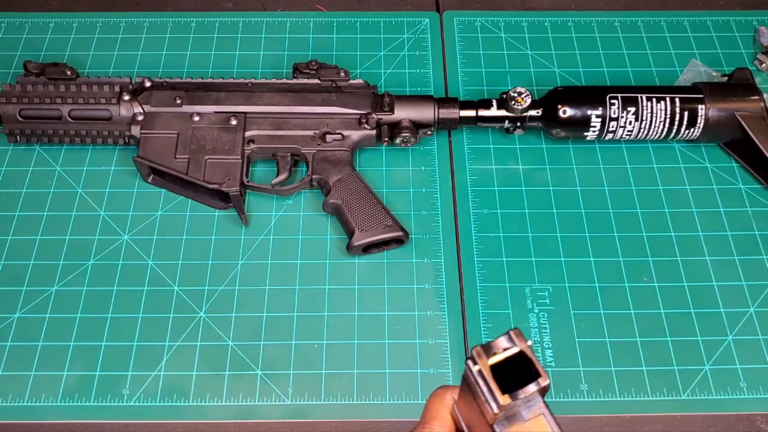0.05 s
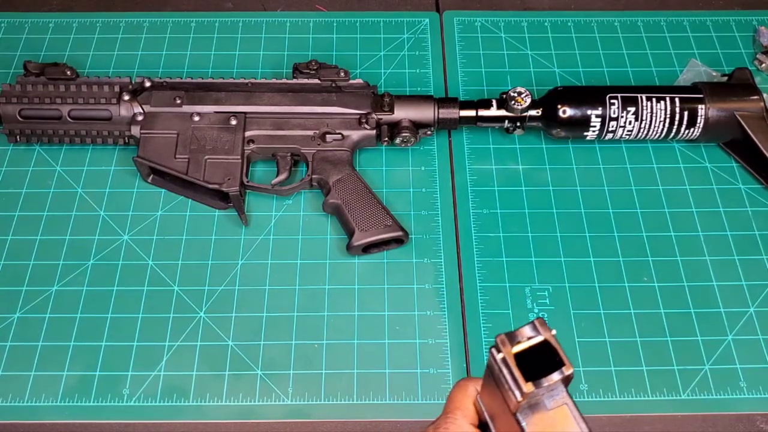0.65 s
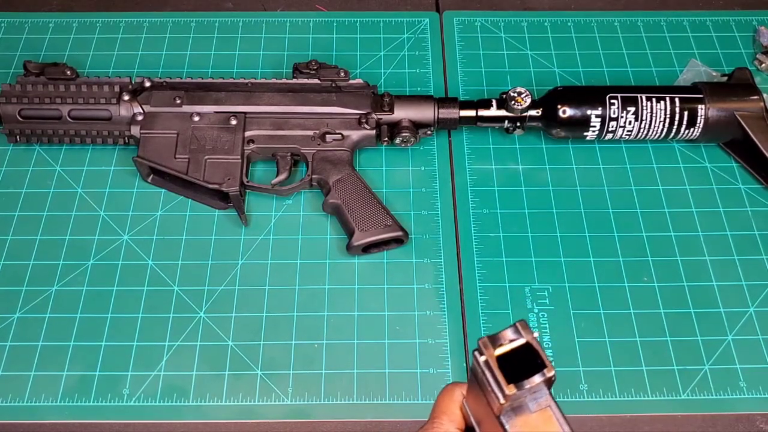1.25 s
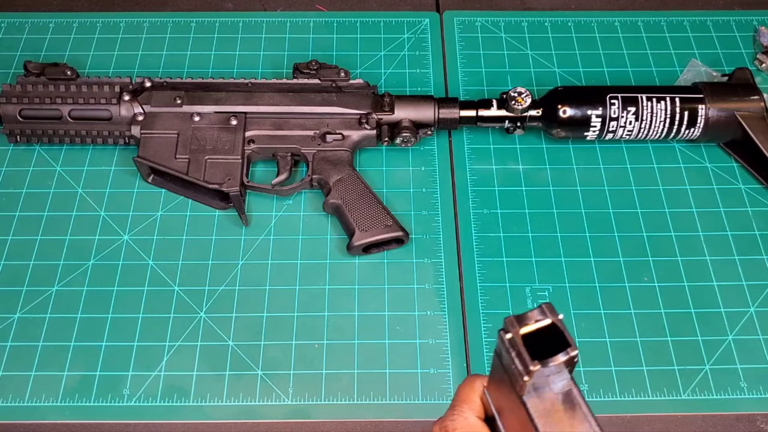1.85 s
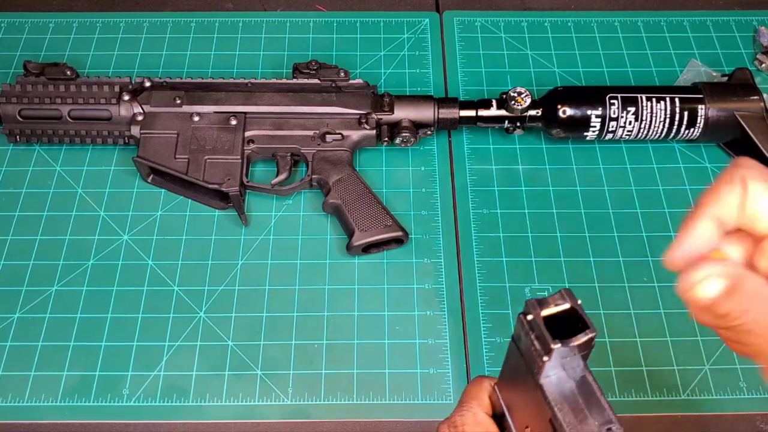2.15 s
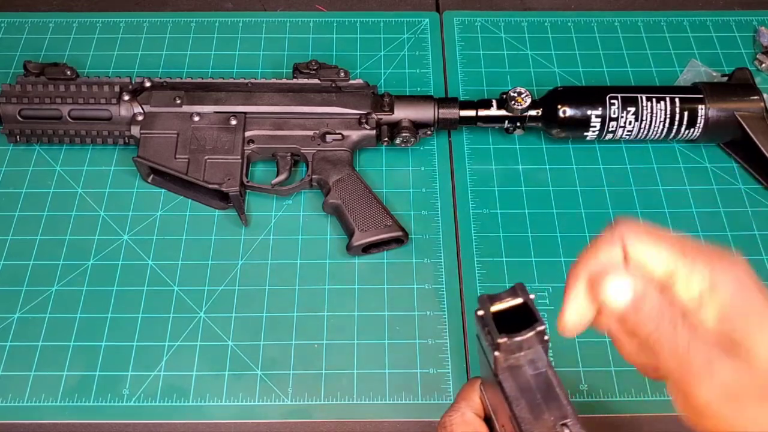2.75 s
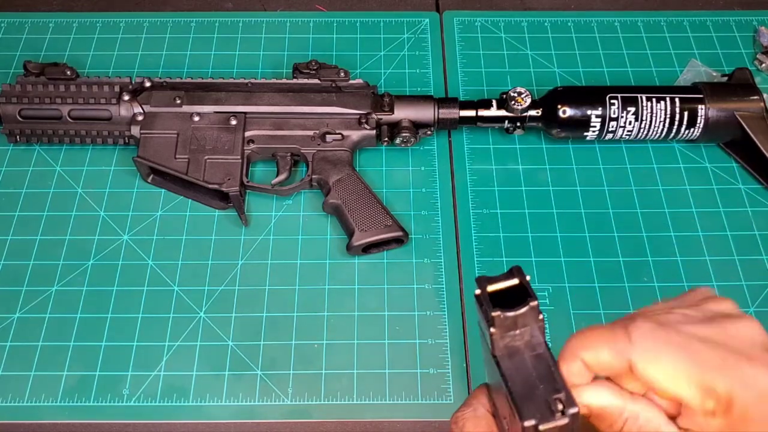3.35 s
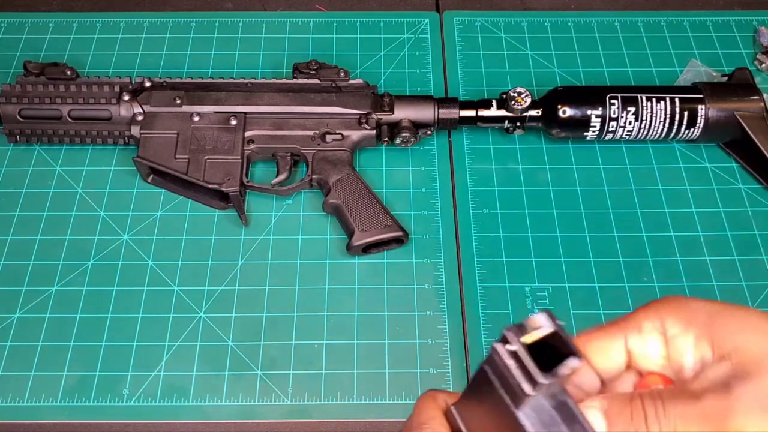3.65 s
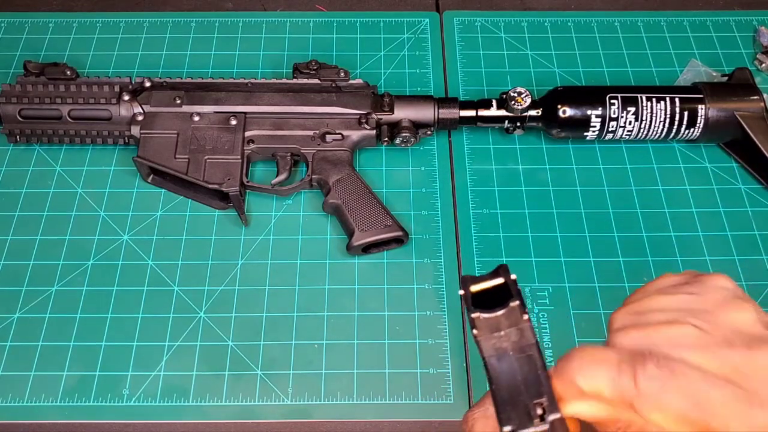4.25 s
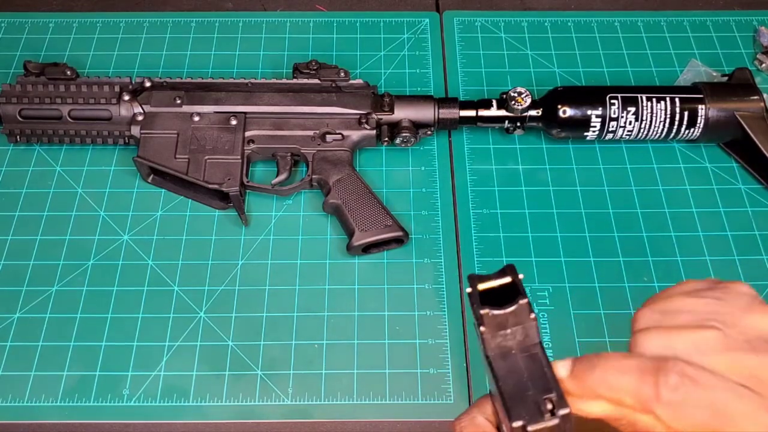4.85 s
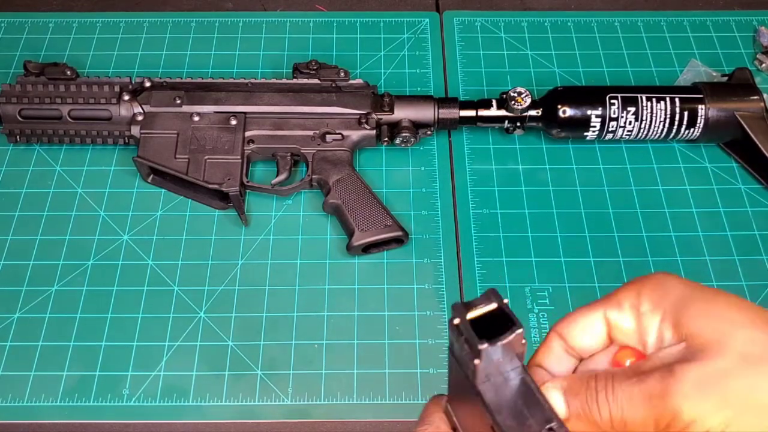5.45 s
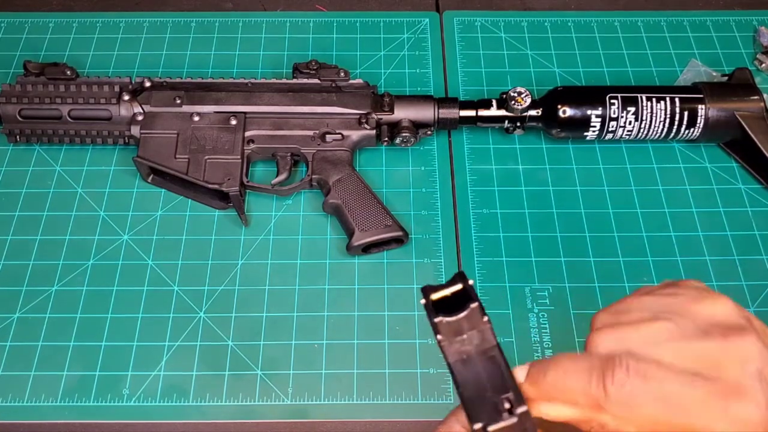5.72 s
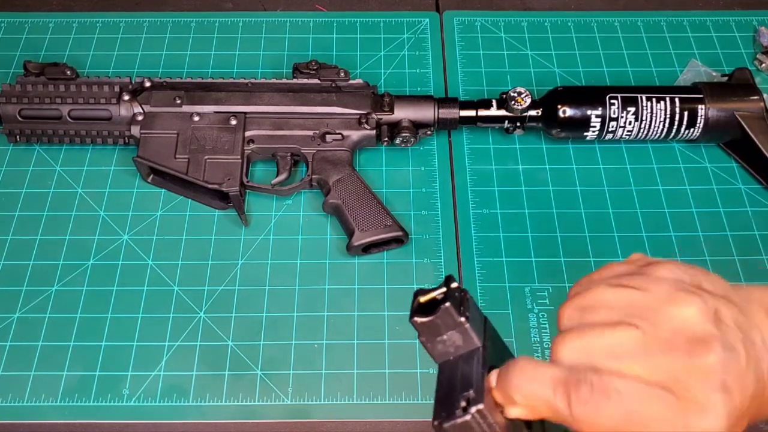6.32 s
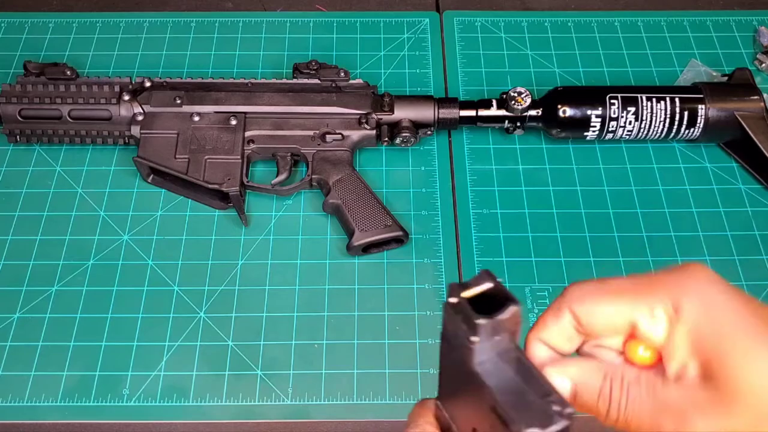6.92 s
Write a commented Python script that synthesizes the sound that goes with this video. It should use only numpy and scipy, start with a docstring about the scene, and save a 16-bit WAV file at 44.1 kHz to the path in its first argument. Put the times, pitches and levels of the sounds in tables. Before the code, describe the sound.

Faint handling ticks on plastic, then four close twists of a spring-loaded magazine winder, each a quick run of hollow ratchet snaps.

```python
"""A workbench in a small quiet room, with a stereo pair of microphones close to the hands.
A plastic paintball magazine is wound in four twists: a pawl snaps over the ratchet teeth and rings
the hollow shell, and after each twist the released winder knocks as it settles. Two snaps carry a low pop.
Fingers tick and rub on the plastic before and between the twists; behind them the room hums faintly."""
import sys
import numpy as np
from scipy import signal
from scipy.fft import rfft, irfft
from scipy.io import wavfile

SR = 44100
rng = np.random.default_rng(int(sys.argv[2]) if len(sys.argv) > 2 else 0)


def materialize(psi):
    """Save the field psi as 16-bit PCM at rate SR to the path in sys.argv[1].

    A 1-D psi becomes a single channel; in a 2-D psi each row is a channel.
    """
    bounded = np.clip(np.atleast_2d(psi).T, -1, 1)
    quanta = np.round(bounded * 32767).astype(np.int16)
    wavfile.write(sys.argv[1], SR, quanta)


N = 307818

# spectrum of the steady background hiss, much fainter above 8 kHz: frequency_hz, relative_db
HISS_SPECTRUM = [(20, -21.5), (62, -2), (100, -11), (200, -16.5), (300, -14.5), (500, -22.5), (1050, -25.5),
                 (1600, -27.5), (3000, -28.5), (5500, -35), (7200, -38), (8500, -55), (11000, -46),
                 (15500, -43)]
# its lean across the microphones: frequency_hz, left_minus_right_db
HISS_PAN = [(60, 4), (150, -3), (380, 1), (950, -1), (2380, -2.0), (5980, -4.5), (15000, 5)]
# its stereo width: frequency_hz, side_minus_mid_db
HISS_WIDTH = [(60, -7), (150, -9), (380, -1), (950, 7.5), (2380, 0.5), (5980, 0), (15000, -1.5)]
# steady tones in the room: pitch_hz, width_hz, level_db, left_minus_right_db
HUM_TONES = [(60.5, 10, -70, 2.5), (1570, 160, -79.5, 5)]
# time for the room to die away: frequency_hz, t60_s
ROOM_DECAY = [(200, 0.64), (1000, 0.28), (2000, 0.37), (4000, 0.34), (7500, .4), (11000, .3), (16000, 0.26)]
# colour of the reflections: frequency_hz, relative_db
REFLECTION_COLOUR = [(200, 9), (1000, -1.5), (1800, 0.5), (3500, -2.5), (6000, -3), (8500, -6.5),
                     (12000, 0), (15500, 1)]
# fingers sliding on the plastic: middle_s, half_length_s, level_db, low_hz, high_hz
FINGER_RUBS = [(0.158, 0.03, -43, 620, 3540), (1.55, 0.025, -76, 8800, 15600),
               (1.709, 0.033, -58.5, 2300, 6800), (2.2, 0.15, -76, 1500, 6400),
               (2.83, 0.065, -74, 9900, 15600), (4.06, 0.017, -68, 1070, 3440),
               (4.84, 0.028, -66.5, 1490, 6850)]
# light finger contacts: start_s, level_db, low_hz, high_hz, decay_ms, left_minus_right_db
FINGER_TICKS = [(0.121, -47.5, 886, 4400, 1.2, -6), (0.1524, -34, 560, 2400, 1.1, -5),
                (0.4586, -35.5, 4200, 6970, 0.49, -4.5), (0.477, -52, 3000, 7000, .8, 10),
                (0.876, -53.5, 244, 1230, 14.6, -3), (1.055, -43.5, 2500, 3900, 5, -1),
                (1.0605, -55.5, 397, 2000, 31, -3), (1.673, -43, 3000, 7300, 1.4, 0),
                (1.712, -49.5, 2900, 7000, .8, 2), (2.216, -62.5, 3000, 7000, 1, -4),
                (2.400, -35, 940, 4240, 2.9, 2.5), (2.74, -56, 2200, 5630, 5.4, 0),
                (3.239, -56.5, 1126, 6400, 2.9, -7), (4.239, -51.5, 890, 3860, 2.6, -8),
                (4.299, -44, 2590, 8870, 1.8, -2), (5.177, -58, 3236, 5880, 3.45, -9)]
# first knock of the released winder after each twist: start_s, level_db
WINDER_RELEASES = [(3.747, -42), (4.637, -45.5), (5.597, -43.5), (6.909, -47.5)]
# low pops that come with two of the snaps: start_s, peak_db
LOW_POPS = [(3.5192, -21.5), (4.375, -31)]
# twists; the spring makes all cracks of one twist equally hard: start_s, crack_db, left_minus_right_db
WINDER_TWISTS = [(3.4, -17, -0.8), (4.3, -18, 0.4), (5.2, -17.5, 0.6), (6.3, -18.5, 2)]
# the pawl's snaps, whose hollow ring varies from tooth to tooth: start_s, ring_db
PAWL_SNAPS = [(3.4359, -16.5), (3.468, -16), (3.4965, -17), (3.5201, -16), (3.5409, -16), (3.5614, -15.5),
              (3.5827, -18.5), (3.6099, -17), (4.3219, -16), (4.3755, -15.5), (4.4107, -18.5),
              (4.4368, -19.5), (4.4594, -18), (4.4809, -18.5), (4.502, -20), (4.5257, -18), (5.2734, -19),
              (5.3212, -15), (5.3508, -17), (5.3748, -16), (5.3964, -19), (5.4195, -17), (5.4469, -16.5),
              (5.48, -18.5), (6.3878, -16), (6.4357, -14.5), (6.4867, -16.5), (6.5267, -19), (6.576, -18),
              (6.631, -18.5), (6.6788, -19.5), (6.7189, -18), (6.7515, -17), (6.7861, -19)]
# modes of the shell and pawl: pitch_hz, width_hz, relative_db, left_minus_right_db
SHELL_MODES = [(1767, 60, -14.5, -9.5), (1809, 57, -6.5, -6.5), (1899, 200, -2.5, -2),
               (2251, 490, -11.5, -4), (2483, 190, -10.5, 0), (3020, 55, -21, -3), (3527, 160, -3.5, -1.5),
               (3854, 450, -10, -3.5), (4630, 1100, -11, -5), (5740, 480, -7, -1.5), (6150, 520, -7, 4),
               (6850, 230, -14, -5.5), (7116, 1100, -8, 2), (8880, 700, -17.5, 6), (10900, 1100, -15, -3.5),
               (12160, 930, -16, 0.5), (13000, 1200, -18.5, -7), (14800, 890, -15, 3.5)]

RING_HZ, CLACK_HZ, CRACK_HZ = 1890, 3300, 6200  # the three registers of a snap


def from_db(db):
    """Decibels to gain."""
    return 10 ** (np.asarray(db) / 20)


def rms_one(x):
    """Scale to unit rms."""
    return x / np.sqrt(np.mean(x ** 2) + 1e-20)


def at_hz(points, hz):
    """Read a table on a log-frequency axis."""
    f, value = np.transpose(points)
    return np.interp(np.log(np.maximum(hz, 1)), np.log(f), value)


def panned(db):
    """Left and right microphone gains as a column."""
    return from_db(np.array([[db], [-db]]) / 2)


def add(out, s, sound):
    """Mix a short sound in at time s."""
    i = int(round(s * SR))
    out[:, i:i + sound.shape[-1]] += sound[..., :N - i]


def band(x, low_hz, high_hz, order=3):
    """Causal band-pass."""
    return signal.sosfilt(signal.butter(order, [low_hz, high_hz], "band", fs=SR, output="sos"), x)


def stereo_noise(size, alike):
    """White noise partly shared by the two microphones."""
    mid, side = rng.standard_normal((2, size))
    return np.sqrt((1 + alike) / 2) * mid + np.sqrt((1 - alike) / 2) * np.array([side, -side])


def hiss_and_hum(hiss_db=-61.5):
    """Soft steady background hiss, with narrow bands of noise for the room's wavering hum."""
    hz = np.fft.rfftfreq(N, 1 / SR)
    mid, side = rfft(rng.standard_normal((2, N))) * from_db(at_hz(HISS_SPECTRUM, hz))
    hiss = mid + from_db(at_hz(HISS_WIDTH, hz)) * np.array([side, -side])
    balance = from_db(np.outer([1, -1], at_hz(HISS_PAN, hz)) / 2)
    out = from_db(hiss_db) * rms_one(irfft(hiss * balance, N))
    for pitch_hz, width_hz, level_db, pan_db in HUM_TONES:
        hum = rfft(rng.standard_normal(N)) / (1 + (2 * (hz - pitch_hz) / width_hz) ** 2)
        out += from_db(level_db) * panned(pan_db) * rms_one(irfft(hum, N))
    return out


def reflections(x, gain_db=-35, early_db=-3, early_s=0.013, first_s=0.0016, move_s=.09, patterns=6):
    """Close reflections merge into a tail, longest in the bass; their pattern shifts as the hands move."""
    t = np.arange(SR * 3 // 5) / SR
    hz, centres_hz = np.fft.rfftfreq(len(t), 1 / SR), np.geomspace(200, 16000, 12)
    bands = np.array([np.interp(hz, centres_hz, row) for row in np.eye(len(centres_hz))])[:, None]
    colour_db = at_hz(REFLECTION_COLOUR, centres_hz)[:, None, None]
    t60_s = at_hz(ROOM_DECAY, centres_hz)[:, None, None]
    decays = from_db(colour_db - 60 * t / t60_s)
    onset = (t > first_s) * (1 + from_db(early_db) * np.exp(-t / early_s))
    place, out = np.arange(N) / SR / move_s, np.zeros((2, N))
    for k in range(patterns):
        noise_bands = irfft(bands * rfft(stereo_noise(len(t), alike=0.091)), len(t))
        tail = onset * (noise_bands * decays).sum(0)
        crossfade = np.clip(1 - np.abs((place - k) % patterns - patterns / 2), 0, 1)
        out += signal.oaconvolve(x * np.sqrt(crossfade), tail, axes=1)[:, :N]
    return from_db(gain_db) * out


def finger_rubs(grain_spread_db=4):
    """Skin slides on plastic: dense uneven grains that swell and fade."""
    out = np.zeros((2, N))
    for middle_s, half_s, level_db, low_hz, high_hz in FINGER_RUBS:
        stroke = np.arange(-2, 2, 1 / (half_s * SR))  # time from the middle, in half lengths
        grains = stereo_noise(len(stroke), alike=0.15)
        grains *= from_db(grain_spread_db * rng.standard_normal(len(stroke)))
        rub = rms_one(band(grains, low_hz, high_hz)) * np.exp(-stroke ** 2)
        add(out, middle_s - 2 * half_s, from_db(level_db) * rub)
    return out


def winder_knocks(count=3, gap_s=0.024, loss_db=3.5, low_hz=1214, high_hz=1900, decay_ms=1.9):
    """The released winder knocks a few times, each time more softly; rows as in FINGER_TICKS."""
    return [(start_s + k * gap_s, level_db - k * loss_db, low_hz, high_hz, decay_ms, 0)
            for start_s, level_db in WINDER_RELEASES for k in range(count)]


def small_contacts(grit_db=-13, spill_db=-16):
    """Ticks and knocks: a sharp touch and dying grit, strongest in the range of the part touched."""
    out, t = np.zeros((2, N)), np.arange(SR // 20) / SR
    for start_s, level_db, low_hz, high_hz, decay_ms, pan_db in FINGER_TICKS + winder_knocks():
        touch = from_db(grit_db) * stereo_noise(len(t), alike=0.22) * np.exp(-t * 1000 / decay_ms)
        touch[:, 0] += 1
        spill = from_db(spill_db) * band(touch, low_hz=600, high_hz=6000, order=6)
        tick = band(touch, low_hz, high_hz) + spill
        tick /= np.sqrt(np.mean(tick[:, :SR // 300] ** 2))  # unit rms over the first 3.3 ms
        add(out, start_s, from_db(level_db) * panned(pan_db) * tick)
    return out


def low_pops(start_hz=950, fall_s=0.0027, swell_s=0.0016, right_gain=-0.36):
    """Short low pops, mostly in the left microphone, whose pitch drops away within a few cycles."""
    out, t = np.zeros((2, N)), np.arange(SR // 50) / SR
    cycles = start_hz * fall_s * (1 - np.exp(-t / fall_s))
    pop = np.sin(2 * np.pi * cycles) * t / swell_s * np.exp(1 - t / swell_s)
    for start_s, peak_db in LOW_POPS:
        add(out, start_s, from_db(peak_db) * np.array([pop, right_gain * pop]))
    return out


def pawl_snaps(clack_offset_db=-0.16, clack_fade_db=5, pan_per_db=-0.14):
    """Each snap's time, register levels and pan: the clack fades over a twist, a full ring leans right."""
    snaps = np.array(PAWL_SNAPS)
    twist_of_snap = np.searchsorted([row[0] for row in WINDER_TWISTS], snaps[:, 0]) - 1
    for k, (_, crack_db, pan_db) in enumerate(WINDER_TWISTS):
        teeth = snaps[twist_of_snap == k]
        for (start_s, ring_db), turned in zip(teeth, np.linspace(-.5, .5, len(teeth))):
            clack_db = crack_db + clack_offset_db - clack_fade_db * turned
            yield start_s, (ring_db, clack_db, crack_db), pan_db + pan_per_db * (ring_db - crack_db)


def pawl_contact(t, chatter_db=-23, chatter_s=0.0029):
    """The pawl strikes, then chatters as it seats on the next tooth; the chatter favours high modes."""
    chatter = np.diff(stereo_noise(len(t) + 1, alike=0.34)) * np.exp(-t / chatter_s)
    contact = from_db(chatter_db) * signal.lfilter([1], [1, -.3], chatter)
    contact[:, 0] = 1
    return contact


def ratchet(strike_db=40.0, rise_s=0.00027, detune=0.0028, mode_spread_db=2.1,
            path_rad_per_octave=.6, wander_rad_per_octave=0.68, apart_hz=7000, radiate_hz=1440):
    """Close to the microphones, each snap of the pawl rings the modes of the hollow shell."""
    out, t = np.zeros((2, N)), np.arange(SR // 20) / SR
    hz, width_hz, mode_db, mode_pan_db = np.transpose(SHELL_MODES)[:, :, None]
    envelopes = 2 * np.pi * width_hz / SR * np.exp(-np.pi * width_hz * t) * (1 - np.exp(-t / rise_s))
    # every mode has its own path to the microphones; short waves reach the two less alike
    path, apart = rng.standard_normal((2, len(hz), 1))
    for start_s, registers_db, pan_db in pawl_snaps():
        # the grip changes a little from tooth to tooth
        tuning, strength, wander = rng.standard_normal((3, len(hz), 1))
        register_db = np.interp(hz, (RING_HZ, CLACK_HZ, CRACK_HZ), registers_db)
        modes = from_db(mode_db + register_db + mode_spread_db * strength) * envelopes
        offset = (path_rad_per_octave * path + wander_rad_per_octave * wander) * np.log2(hz / hz[0])
        phase = 2 * np.pi * hz * (1 + detune * tuning) * t + offset
        at_mics = [modes * from_db(side * mode_pan_db / 2) * np.cos(phase + side * apart * hz / apart_hz)
                   for side in (1, -1)]
        snap = signal.fftconvolve(np.sum(at_mics, axis=1), pawl_contact(t), axes=1)
        add(out, start_s, from_db(strike_db) * panned(pan_db) * snap)
    # below its first mode the small shell radiates only a faint knock
    knock = from_db(-20) * band(out + 1e-18, low_hz=620, high_hz=1050, order=2)
    radiation = signal.butter(6, radiate_hz, "high", fs=SR, output="sos")
    return knock + signal.sosfilt(radiation, out + 1e-18)


def scene():
    """The magazine close to the microphones, and the small room around it."""
    magazine = ratchet() + small_contacts() + finger_rubs()
    return magazine + reflections(magazine) + low_pops() + hiss_and_hum()


def record(dry):
    """The very highest peaks clip, and the treble is cut above 16.3 kHz."""
    treble_cut = signal.ellip(10, .2, 70, 16300, fs=SR, output="sos")
    return signal.sosfilt(treble_cut, np.clip(dry, -.88, .88))


dry = scene()
out = record(dry)
materialize(out)
```